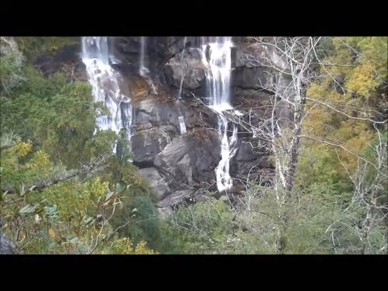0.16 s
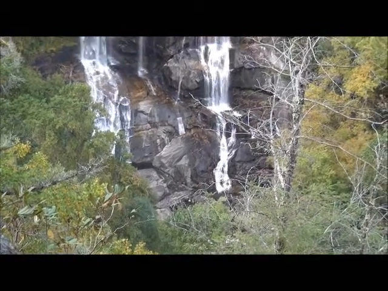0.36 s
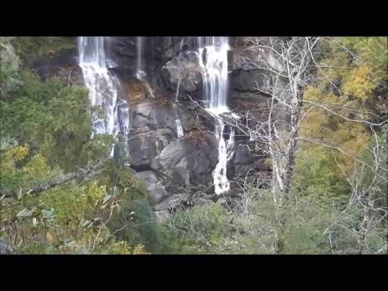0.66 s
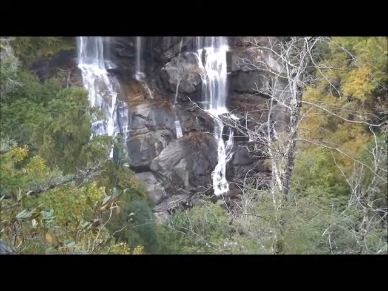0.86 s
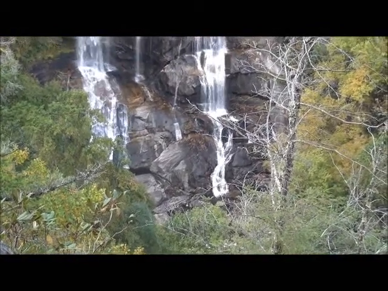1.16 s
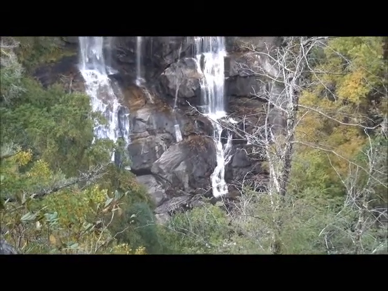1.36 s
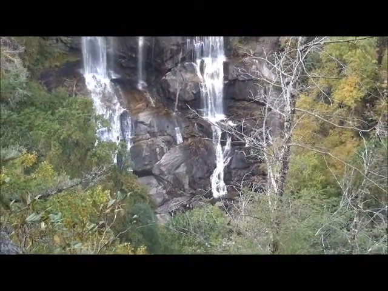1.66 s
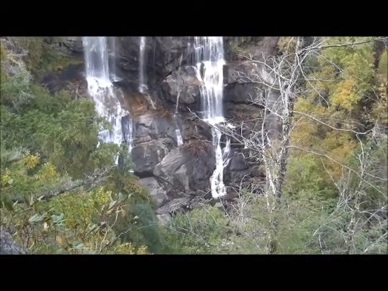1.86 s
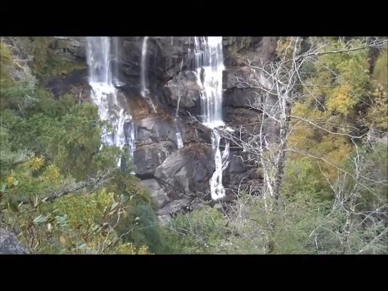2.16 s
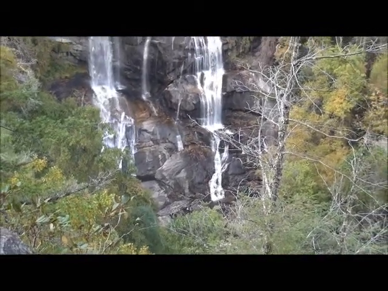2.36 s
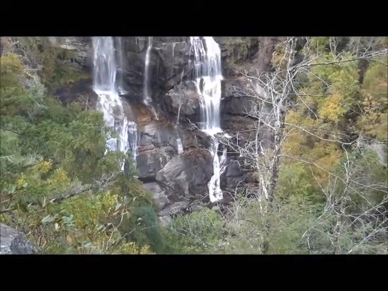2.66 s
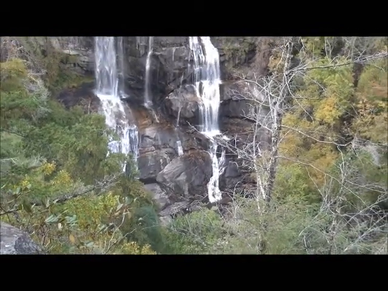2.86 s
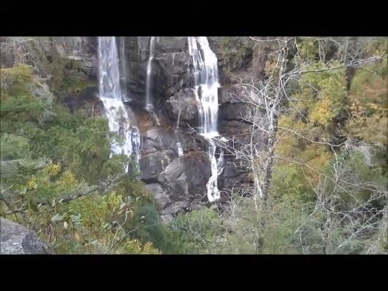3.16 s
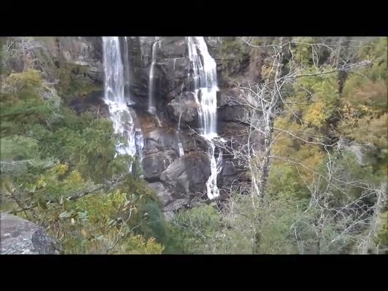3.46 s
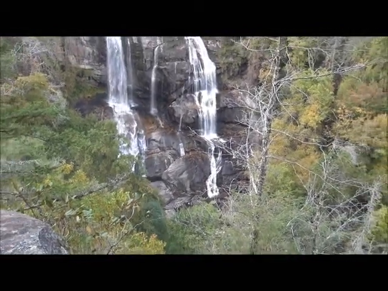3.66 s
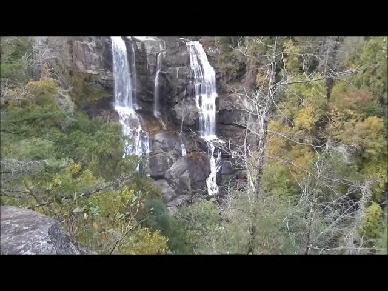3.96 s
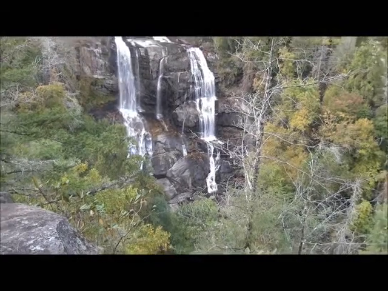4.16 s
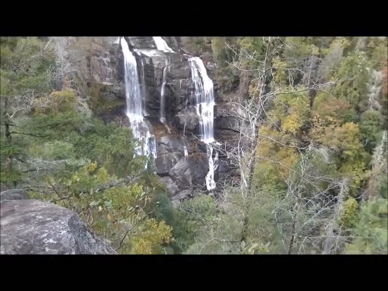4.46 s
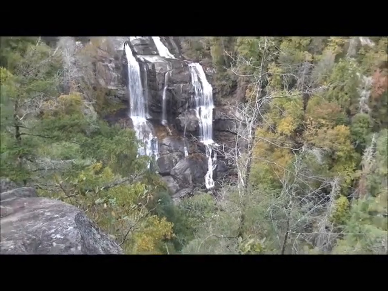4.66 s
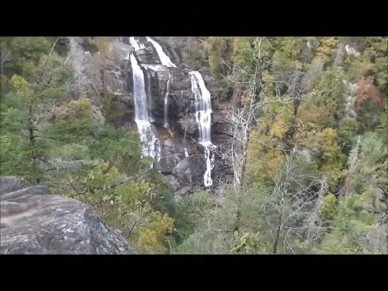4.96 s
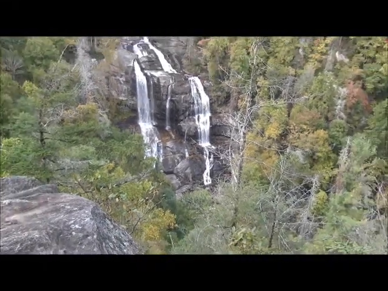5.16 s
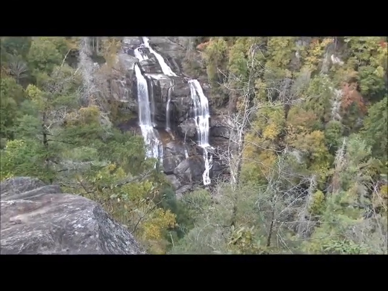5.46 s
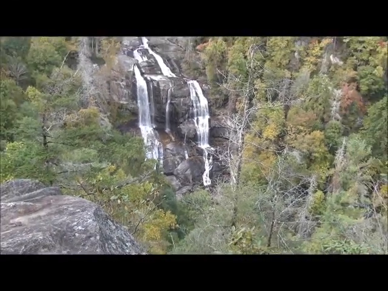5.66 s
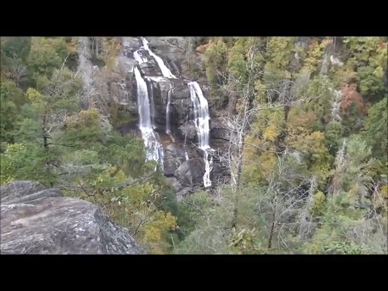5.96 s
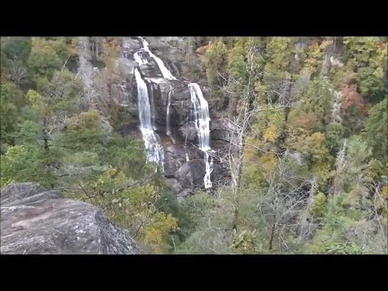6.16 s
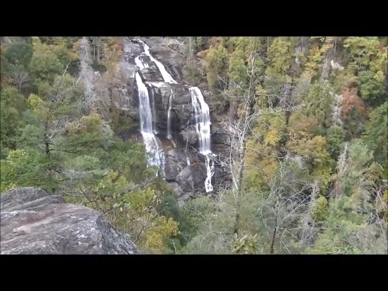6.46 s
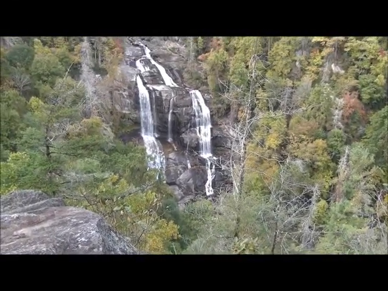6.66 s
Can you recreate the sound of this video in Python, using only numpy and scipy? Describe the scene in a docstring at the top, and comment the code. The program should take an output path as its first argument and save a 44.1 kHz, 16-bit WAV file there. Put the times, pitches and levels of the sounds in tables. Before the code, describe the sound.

From 0 to about 7 seconds, a tall waterfall rushes without pause, heard from far across a wooded gorge. Its many splashes merge into smooth, dense noise, strongest in the low mids and mids, with little deep rumble and treble dulled by the air. The level wavers gently: a slightly brighter flutter around 0.4 to 0.5, fairly full from 1 to 3, then a slow slight drop from about 3.3, softest near 5, with small brighter flickers around 4.7. It grows fuller again by 5.8 to 6.2 and eases slightly towards the end, still flowing. At about 3.04 there is one tiny, hard, high tick, gone almost at once. Underneath lie a faint high hiss, briefly stronger near 0.5 and 4.7, and a barely audible thin, steady camera whine. The stereo image is narrow, nearly centred.

```python
"""A tall waterfall heard from far across a wooded gorge: its countless splashes merge into a smooth rush,
made of coloured noise, dulled by the air, swelling and fading as the moving air bends the sound path.
Behind it are a faint high hiss of noise, a thin camera whine made of sine tones
and one small tick made of short ringing tones. The stereo image is narrow."""
import sys
import numpy as np
from scipy import signal
from scipy.fft import rfft, irfft, next_fast_len
from scipy.io import wavfile
from scipy.ndimage import uniform_filter1d, map_coordinates

SR = 44100
rng = np.random.default_rng(int(sys.argv[2]) if len(sys.argv) > 2 else 0)


def put_to_file(sound):
    """Save the sound as 16-bit audio at rate SR, in the file named by the first command-line argument."""
    columns = np.atleast_2d(sound).T  # one column per channel
    safe = np.clip(columns, -1, 1)
    whole_steps = np.round(safe * 32767)
    wavfile.write(sys.argv[1], SR, whole_steps.astype(np.int16))


N = 301203  # length in samples

# How the rush swells and fades; each pitch range follows it by its own share.
# Each row: time in seconds, level in dB, extra treble in dB before that share.
RUSH_LEVELS = [(0, -23, 0), (.2, -22, 0), (.42, -22, 1.3), (.52, -21, -1.7), (.68, -23, 0.5),
               (.95, -22, 0.4), (1.15, -21, -1.5), (1.35, -21.5, 0), (1.52, -22.5, -0.5),
               (1.8, -21.5, -0.6), (2.15, -21.5, -1.2), (2.45, -21, -0.1), (2.65, -21.5, -0.1),
               (2.9, -21.5, 0.5), (3.1, -21, 0.5), (3.25, -22, 1), (3.4, -22.5, .6), (3.56, -23, -0.3),
               (3.95, -23.5, -0.2), (4.3, -23, -0.1), (4.62, -22.5, 0.5), (4.74, -23, 1), (4.8, -23, -0.8),
               (4.9, -23.5, 0.5), (5.05, -24, 0.7), (5.3, -22.5, 0.1), (5.55, -22, 0), (5.8, -21.5, -0.1),
               (6.0, -22, 0.5), (6.22, -21, -0.3), (6.5, -22.5, 0.6), (6.83, -22.5, 0.1)]


def amp(db):
    """Turn decibels into a gain."""
    return 10 ** (np.asarray(db) / 20)


def unit(x):
    """Scale to an rms (average strength) of 1."""
    return x / np.sqrt(np.mean(x ** 2) + 1e-20)


def along(points, hz):
    """Read a curve of (Hz, value) points, with straight lines between them on a log pitch axis."""
    point_hz, values = np.transpose(points)
    return np.interp(np.log(hz + 1), np.log(point_hz + 1), values)


def wobble(rate, t):
    """A smooth random curve through `rate` random points a second."""
    knots = rng.standard_normal(int(t[-1] * rate) + 4)
    return map_coordinates(knots, [t * rate])


def noise(colour, gain_db):
    """Stereo noise of a fixed colour, with a gain that changes over pitch and time."""
    # How wide the noise sounds. Each row: pitch in Hz, side level against the middle in dB.
    width = [(60, -46), (150, -60), (230, -53), (300, -43), (450, -33), (560, -36), (750, -26.5),
             (1290, -22), (2380, -21), (4400, -20.5), (6500, -18.5), (8000, -34), (15000, -30)]
    m = next_fast_len(N + 8192)
    hz = np.fft.rfftfreq(m, 1 / SR)
    spectra = rfft(rng.standard_normal((2, m))) * amp(along(colour, hz))
    spectra[1] *= amp(along(width, hz))
    mid_side = irfft(spectra, m)[:, :N]
    mid_side /= np.std(mid_side[0])
    # cut into short overlapping slices, set the gain of each pitch, then join them again
    f, t, slices = signal.stft(mid_side, SR, nperseg=1024)
    slices = slices * amp(gain_db(f[:, None], t))
    mid, side = signal.istft(slices, SR, nperseg=1024)[1][:, :N]
    return np.array([mid + side, mid - side])


def waterfall(bass_follow=0.75, treble_follow=0.87):
    """Many distant splashes add up to smooth noise; sheets of water and eddies of air stir it slightly."""
    # Colour of the falls after rock, trees and air. Each row: pitch in Hz, strength in dB per Hz (relative).
    falls_colour = [(12, -46), (25, -28), (60, -14), (140, -5.5), (210, -1.5), (265, -6), (310, -5),
                    (360, -5), (400, -2.5), (528, 0), (720, -1.37), (1000, -0.8), (1250, -2.5), (1560, -2),
                    (2860, -6), (4480, -12.5), (6320, -23.5), (11000, -47.5), (14300, -77)]
    # Brief rises, each around one pitch; those near 10 kHz go with the high hiss swells. # Each row: centre in
    # seconds, rise in dB, half-length in seconds, centre pitch in Hz.
    surge_rows = [(.44, 2.5, 0.033, 2600), (.49, 2, .08, 10000), (2.42, 0, .08, 10000),
                  (3.12, 3.5, .07, 350), (3.65, 3.5, 0.037, 850), (4.42, 2.5, .06, 2500),
                  (4.65, 3, .04, 800), (4.72, 3, .07, 10000), (4.732, 2, .04, 2200),
                  (5.082, 2.5, 0.043, 1600), (5.28, 1.5, .04, 2500), (5.5, 1, 0.054, 350),
                  (5.75, 2.5, .05, 3600)]
    surge_octaves = 0.41  # half-width of a surge in pitch
    patchy_db = 0.5  # rms depth of the random small surges
    s, level_db, treble_db = np.transpose(RUSH_LEVELS)

    def gain_db(hz, t):
        swell_db = np.interp(t, s, level_db) - level_db.mean()
        # the middle of the rush swells most; bass and treble follow only in part
        follow = along([(220, bass_follow), (340, 1.4), (500, 1.07), (2500, 1.06), (6000, treble_follow)], hz)
        tilt = along([(1100, 0.054), (2000, 0.75)], hz) * np.interp(t, s, treble_db)
        # each part of the cascade surges a little on its own: random values smoothed over pitch and time
        field = rng.standard_normal((len(hz), len(t)))
        field = uniform_filter1d(field, size=24, axis=0)
        patches = patchy_db * unit(uniform_filter1d(field, size=10, axis=1))
        surges = 0
        for at, rise_db, half, centre_hz in surge_rows:
            time_offset = (t - at) / half
            pitch_offset = np.log2((hz + 1) / centre_hz) / surge_octaves
            surges = surges + rise_db * np.exp(-time_offset ** 2 - pitch_offset ** 2)
        return level_db.mean() + follow * swell_db + tilt + patches + surges
    return noise(falls_colour, gain_db)


def hiss(flicker_db=0.4):
    """Faint treble noise that partly follows the rush, flickers and swells now and then."""
    # Colour of the hiss. Each row: pitch in Hz, strength in dB (relative).
    hiss_colour = [(6000, -30), (9000, -11), (10300, -6), (11100, -7), (11600, 2.5), (12600, 2), (14000, 0),
                   (14600, -2), (14900, -10), (15700, -11)]
    # Brief swells. Each row: centre in seconds, rise in dB, half-length in seconds, centre pitch in Hz.
    swell_rows = [(.48, 5, .12, 11500), (2.0, 2, .1, 11500), (2.42, 2.5, .12, 11500), (4.28, 2, .07, 11000),
                  (4.72, 5.5, .08, 11300), (4.815, 5.5, .035, 11800), (5.1, 3.5, .22, 11500)]
    steady_db, swell_width_hz = -67, 2200  # the width is a half-width
    follow = 0.5  # share of the rush's swell, in dB, that the hiss takes on
    s, level_db, _ = np.transpose(RUSH_LEVELS)

    def gain_db(hz, t):
        swells = 0
        for at, rise_db, half, centre_hz in swell_rows:
            time_offset = (t - at) / half
            pitch_offset = (hz - centre_hz) / swell_width_hz
            swells = swells + rise_db * np.exp(-time_offset ** 2 - pitch_offset ** 2)
        rush_swell_db = np.interp(t, s, level_db) - level_db.mean()
        return steady_db + follow * rush_swell_db + swells + flicker_db * wobble(12, t)
    return noise(hiss_colour, gain_db)


def whine(waver_db=1.5):
    """The camera whine: thin steady sine tones, each wavering a little in strength."""
    # Each row: pitch in Hz, rms level in dB around which the tone wavers.
    tones = [(13426, -90), (13606, -92), (13666, -84), (13726, -81), (13786, -93), (13966, -94)]
    t = np.arange(N) / SR
    total = np.zeros(N)
    for hz, db in tones:
        strength = np.sqrt(2) * amp(db + waver_db * wobble(4, t))  # root 2 turns rms into peak
        total += strength * np.sin(2 * np.pi * (hz * t + rng.random()))
    return total


def ticks():
    """A small hard tick: a few high tones start at once and die away quickly."""
    # Each row: start in seconds, peak level in dB.
    tick_rows = [(3.0435, -39)]
    # What a tick rings with. Each row: pitch in Hz, relative level in dB, seconds to fade by 60 dB.
    modes = [(9900, -5, .01), (10590, 0, .022), (11150, -3, .014), (11860, -5, .01), (13000, -10, .006),
             (15210, -8, .02)]
    out = np.zeros(N + SR)
    t = np.arange(SR // 10) / SR
    ring = sum(amp(db - 60 * t / t60) * np.sin(2 * np.pi * hz * t) for hz, db, t60 in modes)
    ring /= np.abs(ring).max()
    for start, peak_db in tick_rows:
        out[round(start * SR):][:len(t)] += amp(peak_db) * ring
    return out[:N]


def scene():
    """Add the stereo falls and hiss to the whine and tick, which sit in the centre."""
    return waterfall() + hiss() + whine() + ticks()


def record(dry):
    """The camera keeps nothing from its band limit upwards."""
    top_hz = 15746
    m = next_fast_len(N + 8192)
    kept = np.fft.rfftfreq(m, 1 / SR) < top_hz
    return irfft(rfft(dry, m) * kept, m)[:, :N]


dry = scene()
out = record(dry)
put_to_file(out)
```